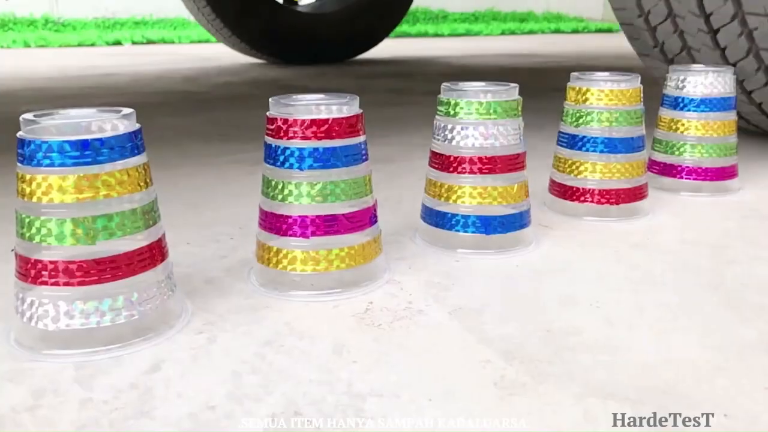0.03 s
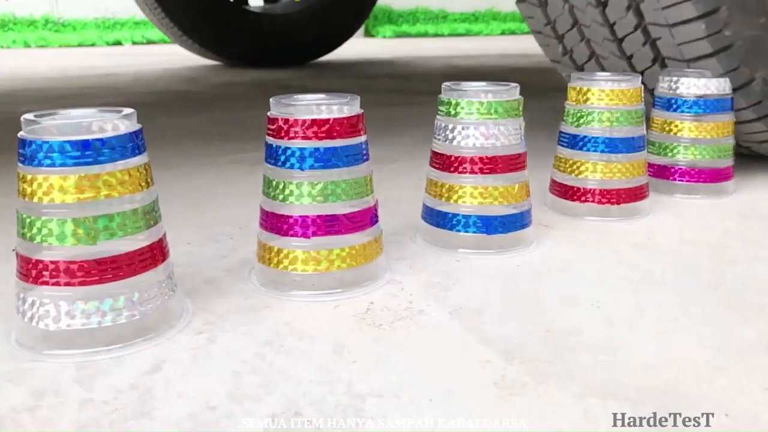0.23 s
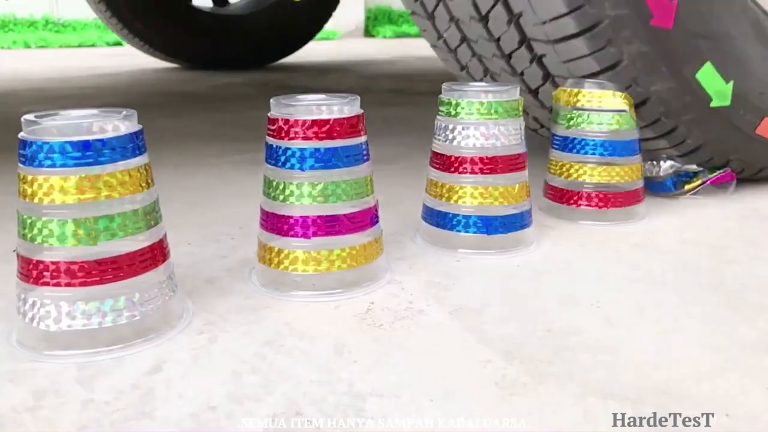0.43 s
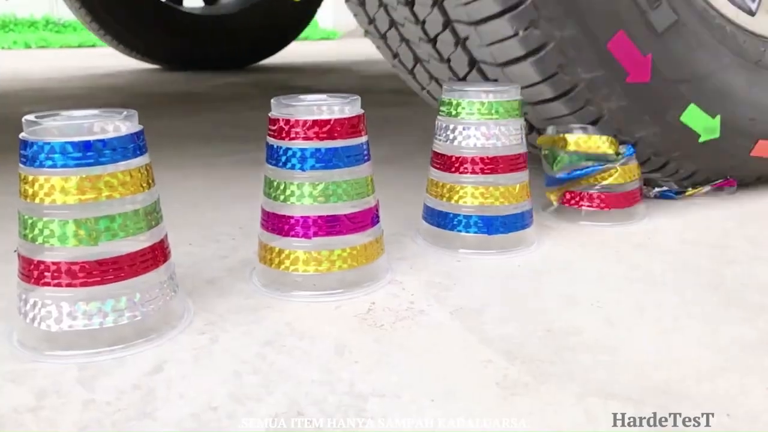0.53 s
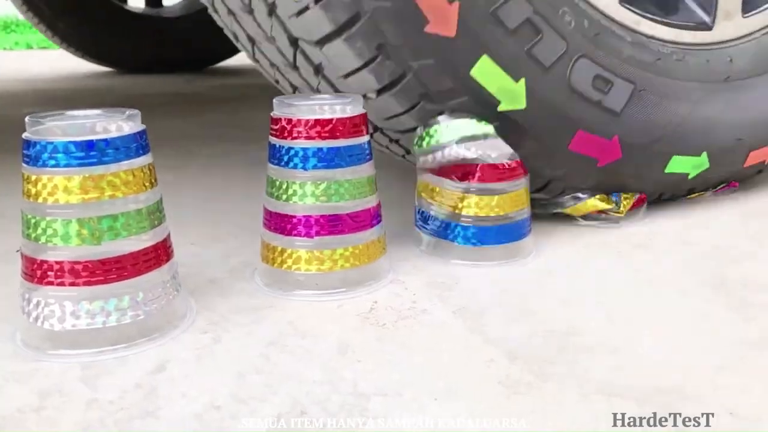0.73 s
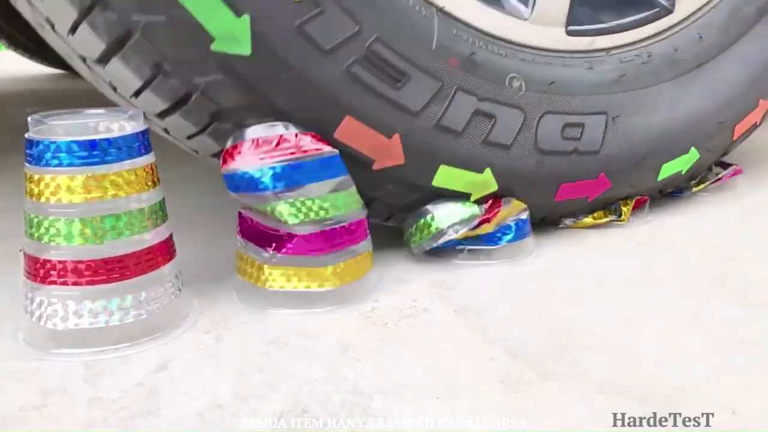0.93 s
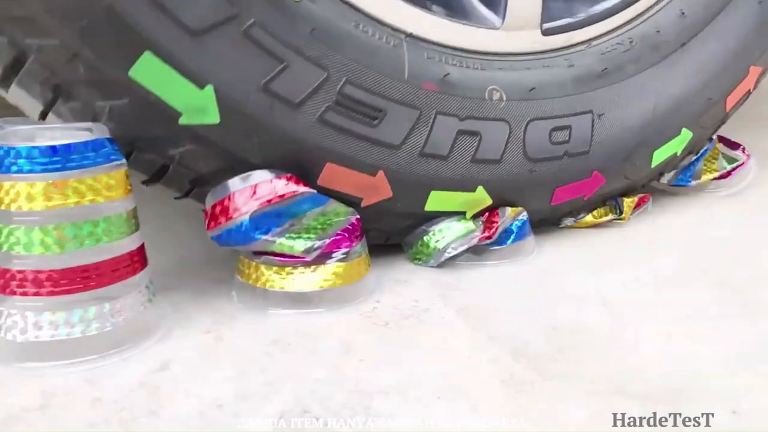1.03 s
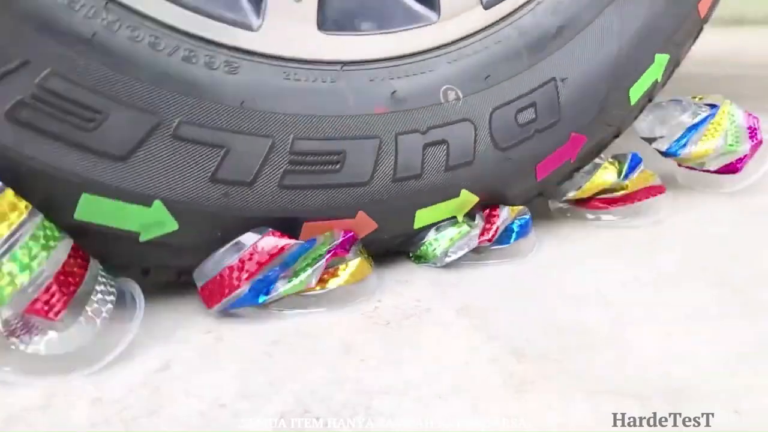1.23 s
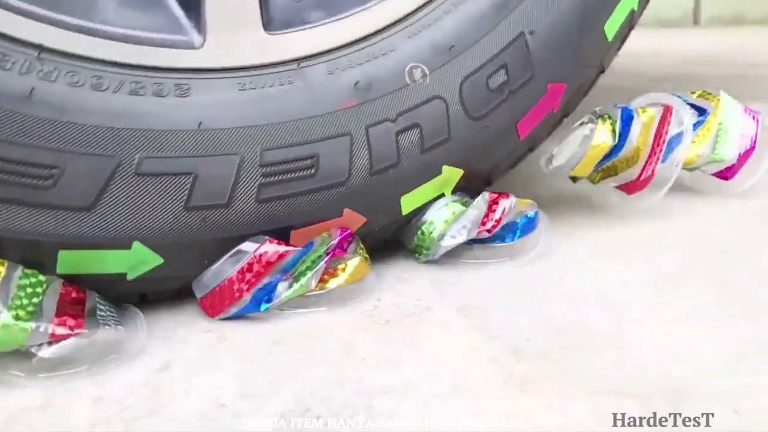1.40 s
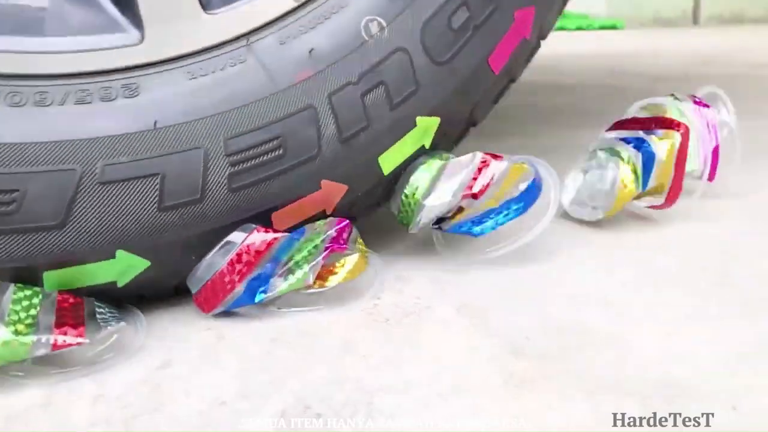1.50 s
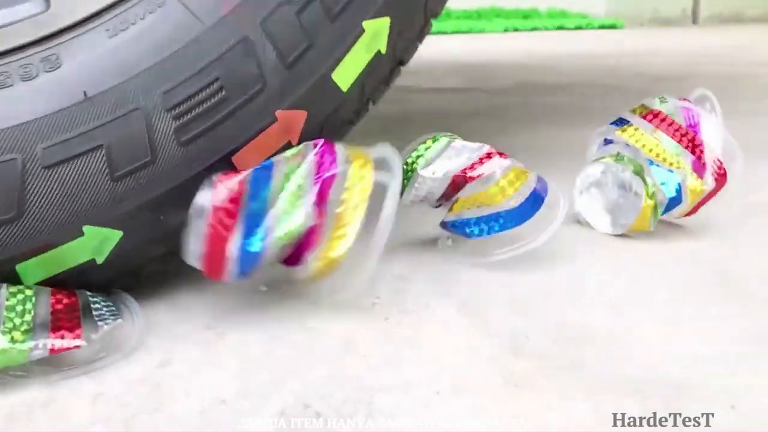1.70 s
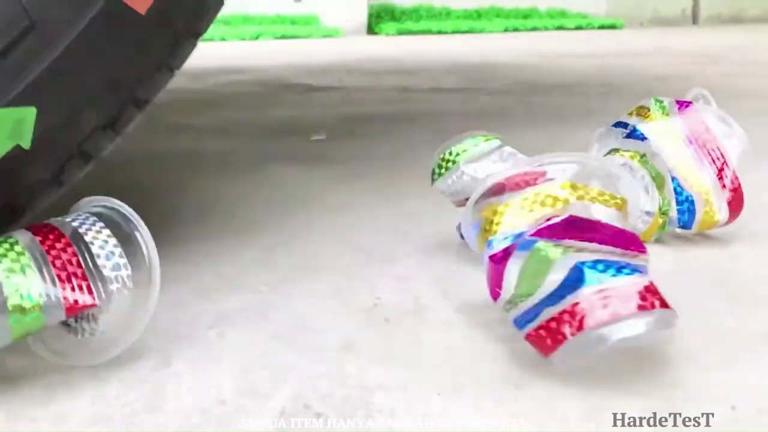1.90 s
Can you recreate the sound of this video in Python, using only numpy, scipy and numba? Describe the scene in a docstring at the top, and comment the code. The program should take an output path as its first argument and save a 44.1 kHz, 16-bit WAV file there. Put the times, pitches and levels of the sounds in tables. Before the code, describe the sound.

Plastic cups crunch under a car tyre, close and fairly dry, on a hard floor. Only faint low rumble and hum until 0.24 s, then sharp cracks with hollow low thuds. Sparser crackles at 0.45 and 0.65 s lead to dense, louder snapping and buckling from 0.85 to 1.35 s, brighter and less hollow. Separate snaps and thin crinkles continue, easing towards 1.9 s.

```python
"""Tyre crushing plastic cups

A car tyre rolls over a row of thin plastic cups on a hard floor, heard from close by. Creases snap and
wall panels buckle as clusters of damped rings; the crushed film crinkles as sprays of tiny rings.
A cavity ring, rectified low thuds and a short noise echo follow from these; faint low rumble and hum
of the car, made of filtered noise, lie underneath."""
import sys
import numpy as np
from scipy import signal
from scipy.fft import rfft, irfft
from scipy.io import wavfile
from numba import njit

SR = 44100
rng = np.random.default_rng(int(sys.argv[2]) if len(sys.argv) > 2 else 0)


def store_wav(level_fs):
    """Save 16-bit WAV to argv[1]."""
    pcm = np.round(np.clip(np.atleast_2d(level_fs), -1, 1) * 32767)
    wavfile.write(sys.argv[1], SR, pcm.T.astype(np.int16))


def makeup_ratio(level_db):
    """Linear amplitude ratio for a level in decibels (20 dB per factor of ten)."""
    decades = np.asarray(level_db, float) / 20
    return 10 ** decades


N = 85995


@njit
def grains(start, hz, cycles, size, turn):
    """Damped rings that swell over part of a cycle and fade by 1/e in their number of cycles."""
    out = np.zeros(N)
    for k in range(len(start)):
        p = np.exp((2j * np.pi - 1 / cycles[k]) * hz[k] / SR)
        z = size[k] * np.exp(1j * turn[k])
        shut, q = 1., np.exp(-3 * hz[k] / SR)
        for i in range(start[k], min(N, start[k] + int(6 * cycles[k] * SR / hz[k]))):
            out[i] += z.imag * (1 - shut)
            z *= p
            shut *= q
    return out


def colour_db(table, hz):
    """Spectrum points joined on a log-frequency axis."""
    table = np.array(table)
    return np.interp(np.log(hz), np.log(table[:, 0]), table[:, 1])


def rms(x):
    """Root mean square."""
    return np.sqrt(np.mean(x ** 2))


def rumble():
    """Coloured low noise and a wavering hum (noise through a narrow resonance), both fading."""
    # Spectrum of rumble and air. Each row: frequency in Hz, relative density in dB per Hz.
    rumble_colour = [(12, 13), (30, 5), (75, 8.5), (120, -10), (250, -15.5), (600, -13.5), (2000, -32.5),
                     (16000, -72)]
    rumble_db, rumble_fade_db_per_s = -51, -5
    hum_hz, hum_db, hum_fade_db_per_s = 186.5, -56.5, -13
    t = np.arange(N) / SR
    hz = np.arange(N // 2 + 1) * SR / N + 1  # 1 Hz offset avoids log(0)
    noise = irfft(rfft(rng.standard_normal(N)) * makeup_ratio(colour_db(rumble_colour, hz)), N)
    hum = signal.lfilter(*signal.iirpeak(hum_hz, 6, SR), rng.standard_normal(N))
    noise_gain = makeup_ratio(rumble_db + rumble_fade_db_per_s * t)
    hum_gain = makeup_ratio(hum_db + hum_fade_db_per_s * t)
    return noise / rms(noise) * noise_gain + hum / rms(hum) * hum_gain


def crinkle(count=2600, size=16):
    """Thousands of uneven film ticks, each a short or drawn-out spray of rings, follow the crumpling."""
    # How hard the film is crumpled. Each row: time in seconds, relative level in dB, treble gain in dB.
    crumpling = [(0.237, -30, -2), (0.252, -26.5, 0), (0.388, -47.5, -3), (0.433, -36, -19), (0.44, -33, 2),
                 (0.465, -30.5, -2), (0.613, -42.5, -10.5), (0.651, -29, 12.5), (0.659, -37, -7.5),
                 (0.717, -34.5, 3.5), (0.747, -43.5, -6), (0.829, -37.5, 1), (0.846, -26.5, 3.5),
                 (0.881, -41.5, -15), (0.892, -33, 4.5), (1.01, -36.5, 0), (1.045, -37, -15),
                 (1.065, -28, 3.5), (1.175, -42.5, -7.5), (1.23, -31, -4.5), (1.346, -43, -3),
                 (1.383, -37.5, -8), (1.46, -54, 10), (1.478, -39, -2), (1.542, -38.5, 1.5),
                 (1.637, -43.5, 8), (1.691, -41.5, -5), (1.728, -40.5, 26), (1.737, -55, -2),
                 (1.761, -45, 9.5), (1.845, -46, -3), (1.864, -52.5, -8), (1.913, -41, 3.5),
                 (1.95, -44.5, -30)]
    # Colour of the tiny crinkles. Each row: frequency in Hz, relative level in dB.
    crinkle_colour = [(250, -15), (390, -8.5), (700, 4), (1500, 3.5), (2600, -4), (5000, 0.5), (9000, -5),
                      (16000, -10.5)]
    ring_cycles, treble_from_hz, tick_slope_db_per_oct = 2.35, 4530, 4.5
    scatter_db, scatter_top_db, spray_s = 7, 15, 0.0082
    tick, ring = rng.random((count, 4)), rng.random((count, size, 4))
    time_s, crumple_db, treble_db = np.array(crumpling).T

    tick_s = time_s[0] + tick[:, :1] * (N / SR - time_s[0])
    at = tick_s + spray_s * tick[:, 2:3] ** 2 * ring[..., 0]
    low_hz, high_hz = crinkle_colour[0][0], crinkle_colour[-1][0]
    hz = low_hz * (high_hz / low_hz) ** ((np.arange(size) + ring[..., 1]) / size)
    own_hz = low_hz * (high_hz / low_hz) ** tick[:, 3:]  # each tick favours its own band

    treble = 1 / (1 + (treble_from_hz / hz) ** 4)
    db = colour_db(crinkle_colour, hz) + np.interp(at, time_s, crumple_db)
    db = db + treble * np.interp(at, time_s, treble_db)
    db = db + 12 * (ring[..., 3] - .7)
    db = db + tick_slope_db_per_oct * (1 - np.abs(np.log2(hz / own_hz)))
    # few ticks are loud, most are soft
    db = db + np.minimum(-scatter_db * (np.log(1 - tick[:, 1:2]) + 1), scatter_top_db)

    start = (at * SR).astype(np.int64)
    ring_size = np.sqrt(hz / 1000) * makeup_ratio(db) / 4
    cycles = ring_cycles + 0 * hz
    turn = 2 * np.pi * ring[..., 2]
    return grains(start.ravel(), hz.ravel(), cycles.ravel(), ring_size.ravel(), turn.ravel())


def clusters(table, lead_cycles, cycles, spread_oct, crowd_db, count):
    """Each event: one leading ring at its pitch inside a crowd of smaller cracks at scattered pitches."""
    at, event_db, hz, ms = (c[:, None] for c in np.array(table, float).T)
    chance = rng.random((len(table), 4, count))
    crowd = np.arange(count) > 0  # ring 0 leads
    lag = crowd * (chance[:, 0] ** 1.6 * 1.9 - .2)  # in event lengths; a few come early
    place = (np.arange(count) + chance[:, 1]) / count
    pitch = np.clip(hz * 2 ** (crowd * spread_oct * (place * 2.705 - 1)), 120, .4 * SR)

    lag_db = -9.4 * lag * (lag > 0) + 36.6 * lag * (lag < 0)
    size = makeup_ratio(event_db + crowd * (crowd_db + lag_db - 3.4 * chance[:, 2]))
    size = size * np.minimum(pitch / hz, (hz / pitch) ** .25)  # weaker away from the event's pitch
    start = ((at + lag * ms / 1000) * SR).astype(np.int64)
    ring_cycles = np.where(crowd, cycles, lead_cycles) + 0 * pitch
    turn = 2 * np.pi * chance[:, 3]
    return grains(start.ravel(), pitch.ravel(), ring_cycles.ravel(), size.ravel(), turn.ravel())


def buckles():
    """Wall panels buckle with low pops: clusters of heavily damped rings."""
    # Each row: start in seconds, relative level in dB, ring pitch in Hz, event length in ms.
    buckle_events = [(0.2409, -23, 470, 5.6), (0.2578, -16.5, 534, 6.4), (0.3206, -26, 380, 10),
                     (0.4572, -27, 465, 4.5), (0.4799, -22.5, 483, 7.2), (0.6469, -36, 1026, 5.7),
                     (0.693, -15.5, 989, 12.7), (0.7201, -23, 490, 9.5), (0.7977, -28, 460, 2.8),
                     (0.8253, -22, 564, 5.7), (0.8372, -20, 790, 8.5), (0.8515, -36, 707, 6.9),
                     (0.8717, -17.5, 585, 5), (0.8915, -9.5, 1690, 5.9), (0.9506, -16, 1080, 3.8),
                     (0.9755, -16, 1460, 1.8), (1.0495, -28, 497, 8.5), (1.0613, -9.5, 630, 8.26),
                     (1.0961, -12, 690, 1.88), (1.1432, -21, 900, 6.1), (1.1951, -9.5, 1070, 3.35),
                     (1.2234, -11, 1264, 5), (1.2443, -8.5, 1820, 6.7), (1.2618, -21.5, 610, 5.1),
                     (1.2802, -14, 1000, 1.35), (1.322, -12.5, 1800, 9.6), (1.4095, -20.5, 1080, 3.4),
                     (1.4322, -21, 980, 5), (1.4764, -17.5, 1440, 3.47), (1.488, -28.5, 1050, 1.3),
                     (1.497, -31, 980, 1.5), (1.5062, -25, 660, 1.5), (1.5377, -10.5, 1570, 3.7),
                     (1.625, -21, 850, 15), (1.64, -13.5, 1624, 3), (1.655, -20.5, 1530, 4.4),
                     (1.7015, -19, 1620, 2.3), (1.7072, -29, 980, 2.3), (1.7536, -17.5, 1910, 3.45),
                     (1.7797, -20.5, 1050, 2.5), (1.8487, -14, 1450, 8), (1.884, -31, 395, 4.5)]
    return clusters(buckle_events, lead_cycles=1.196, cycles=0.82, spread_oct=1.13, crowd_db=-4, count=16)


def snaps():
    """Creases snap sharply: clusters of short, mostly high rings."""
    # Each row: start in seconds, relative level in dB, ring pitch in Hz, event length in ms.
    snap_events = [(0.2579, -14.5, 3180, 3.05), (0.2849, -10.5, 4730, 1.61), (0.3165, -25.5, 4400, 3.1),
                   (0.4415, -23.5, 3970, 4.3), (0.4594, -18.5, 4236, 1.32), (0.4721, -27, 3600, 5.8),
                   (0.4885, -18.5, 3800, 4.8), (0.4982, -23, 5370, 2.6), (0.5372, -24.5, 4200, 1.7),
                   (0.5945, -30, 5070, 0.94), (0.6484, -20.5, 4188, 1.84), (0.7833, -14, 5130, 0.74),
                   (0.7988, -25.5, 3650, 1.45), (0.8442, -36, 3500, 3), (0.8905, -16.5, 5150, 3.06),
                   (0.9251, -20, 4800, 1.64), (1.016, -20, 4459, 2.8), (1.0323, -17, 4270, 0.44),
                   (1.0648, -17, 5300, 11), (1.0733, -14.5, 3100, 1.64), (1.0811, -22, 5060, 2),
                   (1.0961, -14, 7840, 0.91), (1.1198, -47, 5700, 0.83), (1.1639, -22, 5050, 1),
                   (1.1795, -26, 5040, 0.95), (1.195, -12, 6900, 0.65), (1.2234, -14.5, 4040, 3),
                   (1.2454, -12.5, 5470.0, 2.6), (1.3236, -17.5, 7130, 0.96), (1.3691, -19, 5600, 1.3),
                   (1.38, -20, 4516, 2.4), (1.3919, -18, 4900, 0.74), (1.4461, -28.5, 4800, 2.16),
                   (1.52, -17.5, 4900, 2.16), (1.537, -20.5, 4720, 1.6), (1.639, -21, 5170, 4.8),
                   (1.7538, -18.5, 4440, 2.66), (1.7799, -20, 3140, 1.56), (1.7933, -26.5, 3300, 1.9)]
    return clusters(snap_events, lead_cycles=3.36, cycles=3.36, spread_oct=0.967, crowd_db=-1, count=24)


def hollowness():
    """Gain of cavity ring and thud, which flattened cups lose."""
    flat_from_s, flat_db_per_s = 0.7, -8
    return makeup_ratio(flat_db_per_s * np.maximum(np.arange(N) / SR - flat_from_s, 0))


def radiate(cracks):
    """Small cups radiate little bass and add the ring of their cavity."""
    low_hz, cavity_hz, cavity_db = 302, 367.4, 9
    cups = signal.lfilter(*signal.butter(2, low_hz, "high", fs=SR), cracks)
    cavity = signal.lfilter(*signal.iirpeak(cavity_hz, 4, SR), cups)
    return cups + hollowness() * makeup_ratio(cavity_db) * cavity


def thuds(pops, film):
    """The crushing thuds through tyre and floor: its rectified push, band-passed."""
    thud_hz, thud_db, film_db = 234, -4.5, 3.5
    push = signal.lfilter(*signal.butter(2, 3.96 * thud_hz, fs=SR), pops + makeup_ratio(film_db) * film)
    band = signal.butter(3, [thud_hz / 2, thud_hz * 2], "band", fs=SR)
    return hollowness() * makeup_ratio(thud_db) * signal.lfilter(*band, np.abs(push))


def short_echo(cups):
    """Echo between floor and car body: convolution with decaying noise of unit energy."""
    echo_db, echo_t60_s = -12, 0.054
    t = np.arange(SR // 4) / SR
    echo = rng.standard_normal(len(t)) * makeup_ratio(-60 * t / echo_t60_s)
    wet = signal.fftconvolve(cups, echo / np.sqrt(np.sum(echo ** 2)))[:N]
    return makeup_ratio(echo_db) * wet


def scene():
    """Sums the cups, their thuds and echo, and the rumble, as one channel."""
    low = rumble()
    film = crinkle()
    pops = buckles()
    cups = radiate(snaps() + pops + film)
    return (cups + thuds(pops, film) + short_echo(cups) + low)[None]


def roll_off(x):
    """The treble ends steeply here."""
    return signal.sosfilt(signal.butter(12, 16990, fs=SR, output="sos"), x)


def record(dry):
    """Soft limiting of the loudest peaks, then a steep low-pass at 16 kHz."""
    peak_ceiling, top_hz = 0.54, 16000
    limited = peak_ceiling * np.tanh(dry / peak_ceiling)
    mix = signal.sosfilt(signal.butter(24, top_hz, fs=SR, output="sos"), limited)
    return roll_off(mix)


dry = scene()
out = record(dry)
store_wav(out)
```